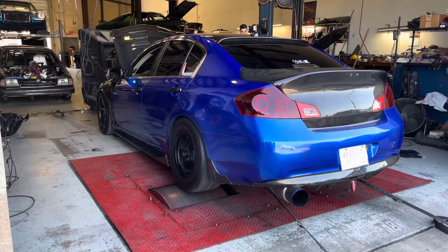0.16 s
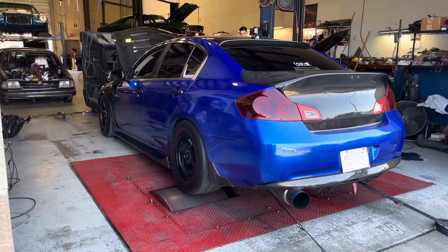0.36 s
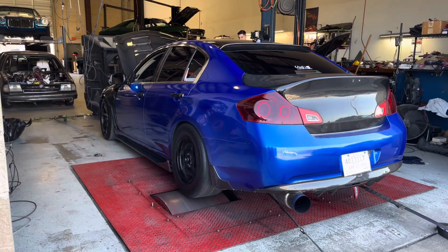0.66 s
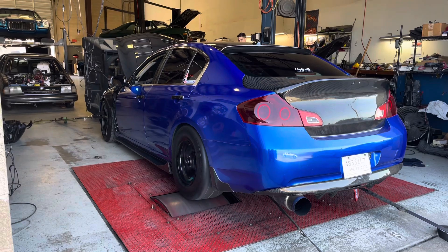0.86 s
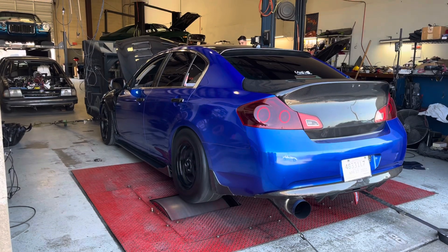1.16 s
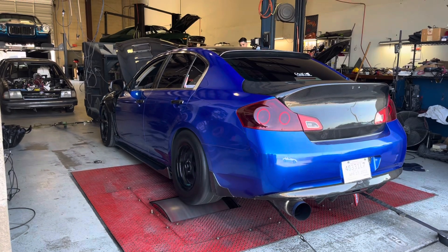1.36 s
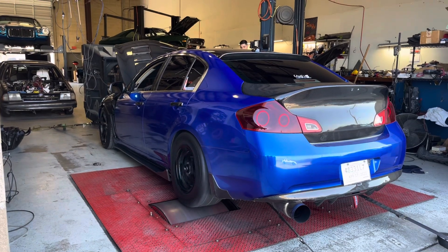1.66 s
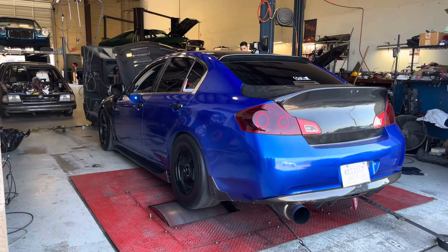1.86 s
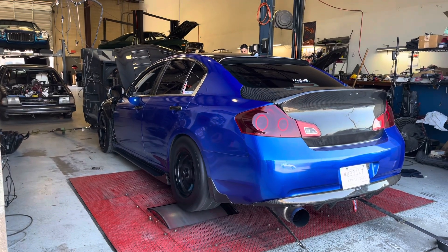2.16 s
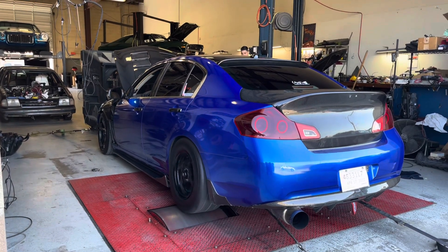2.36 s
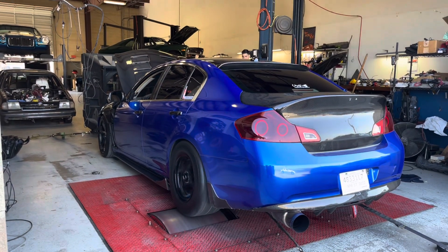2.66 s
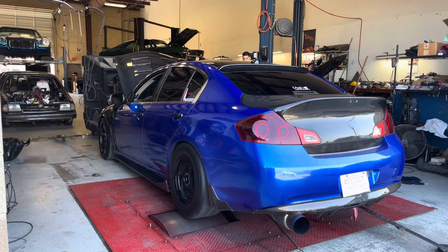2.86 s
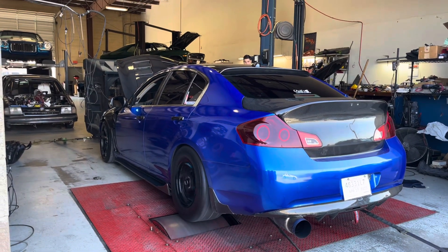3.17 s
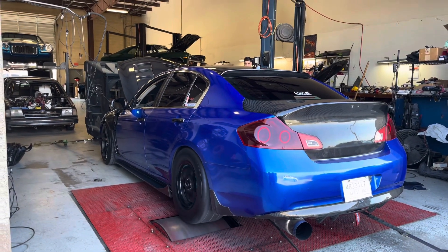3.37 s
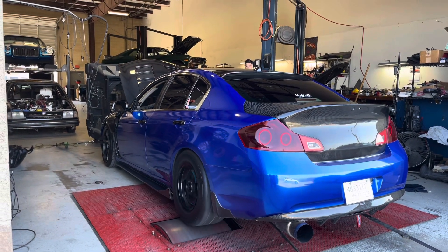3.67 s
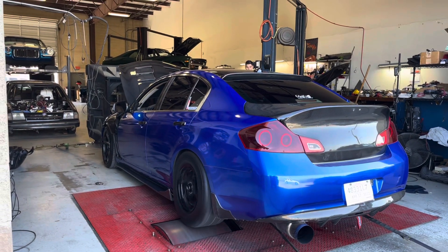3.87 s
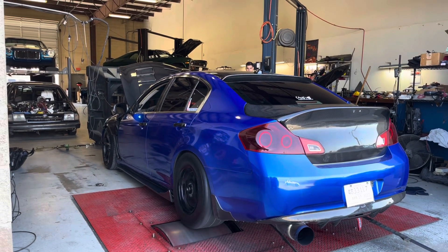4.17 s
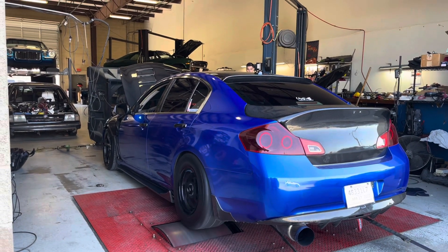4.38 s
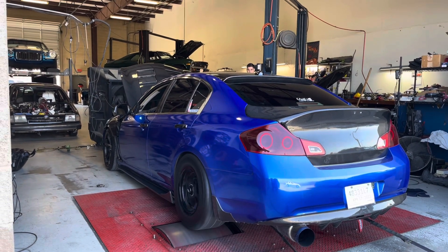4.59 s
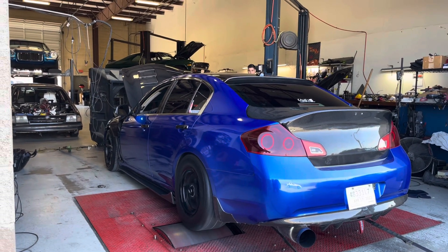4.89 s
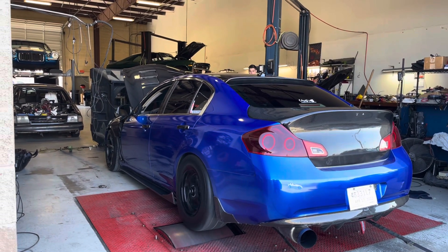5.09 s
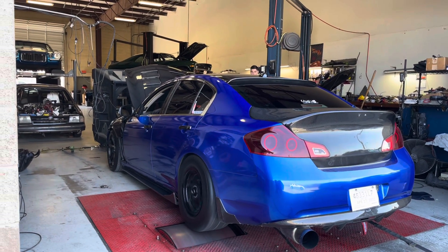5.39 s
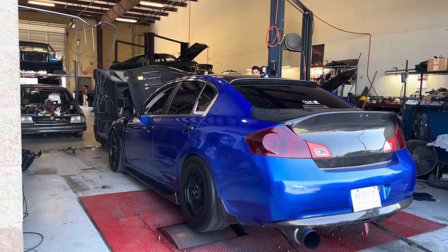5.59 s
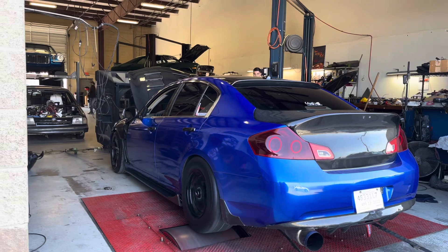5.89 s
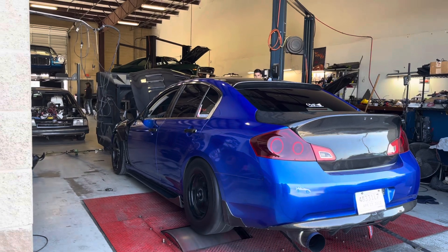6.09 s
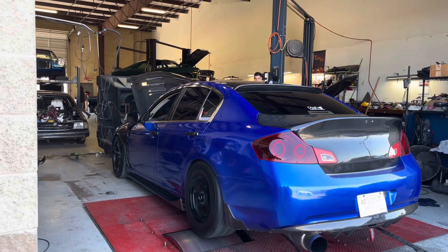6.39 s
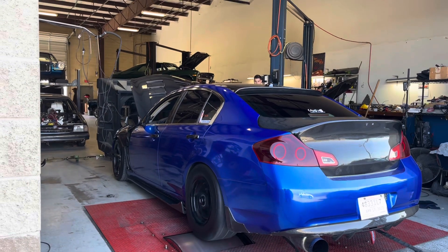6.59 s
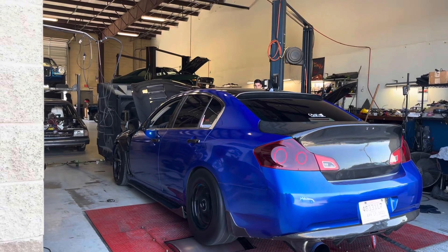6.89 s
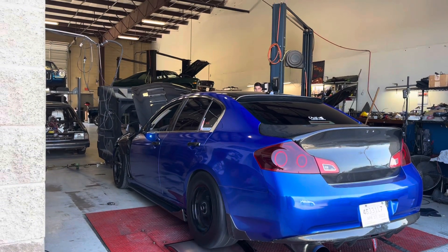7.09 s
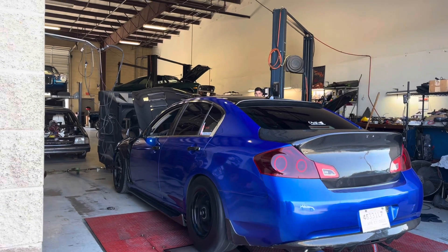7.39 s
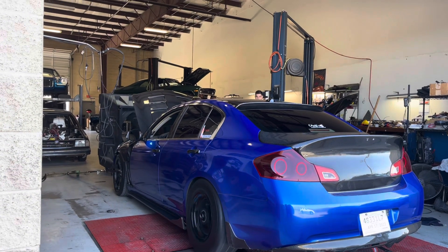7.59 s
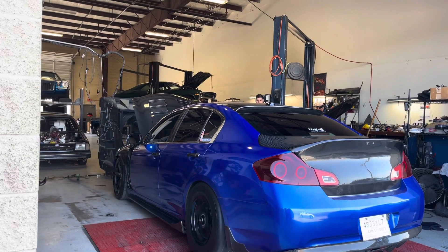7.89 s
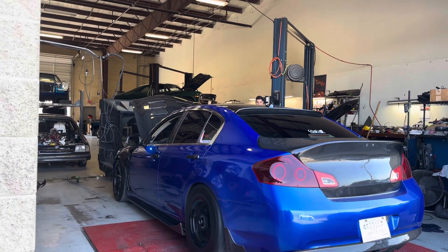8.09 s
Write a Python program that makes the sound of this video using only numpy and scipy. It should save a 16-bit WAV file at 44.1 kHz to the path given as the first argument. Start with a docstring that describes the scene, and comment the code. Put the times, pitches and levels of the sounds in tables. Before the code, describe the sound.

Loud, close exhaust note in stereo, climbing continuously for eight seconds without a gear change or lift. Deep boom, uneven cylinder bark and metallic buzz come with pulsing gas hiss. Early on it lopes and spits; at about two seconds it jumps into a harder, brighter tone. Later a thin whine joins the howl. Light air rumble touches the microphone; the garage adds a short, dense echo.

```python
"""V6 full-throttle pull on a workshop dynamometer.

Heard from behind the car: firing harmonics boom, uneven cylinder pulses bark through filters, steep pulse
fronts rasp and whine at the tailpipe, and gated noise makes the roar and jet hiss as the revs climb.
At 2.17 s the engine comes on cam and the note hardens. Noise-burst reflections form the room;
a noise draught and short decaying low tones thump the microphone."""
import sys
import numpy as np
from scipy import signal
from scipy.fft import rfft, irfft, next_fast_len
from scipy.io import wavfile
from scipy.ndimage import uniform_filter1d, map_coordinates

SR = 44100
rng = np.random.default_rng(int(sys.argv[2]) if len(sys.argv) > 2 else 0)


def int16_out(signal):
    """Quantize to a 16-bit WAV file."""
    q = np.round(np.clip(np.atleast_2d(signal).T, -1, 1) * 32767)
    wavfile.write(sys.argv[1], SR, q.astype(np.int16))


N = 363825
TIME_S = np.arange(N) / SR
LEFT_RIGHT = np.array([[1], [-1]])   # opposite signs at the two microphones


def from_db(db):
    """Amplitude ratio of a level in dB."""
    return 10 ** (np.asarray(db) / 20)


def rms_one(x):
    """Scale to unit RMS."""
    return x / np.sqrt(np.mean(x ** 2) + 1e-20)


def in_time(rows):
    """Second column of a (time, value) table, interpolated at every sample."""
    time_s, value = np.transpose(rows)
    return np.interp(TIME_S, time_s, value)


def bump(x, centre, half_width):
    """Gaussian bump of height 1, down to 1/e at the half width."""
    return np.exp(-((x - centre) / half_width) ** 2)


def drift(rate_hz):
    """Smooth random curve of unit RMS."""
    knots = rng.standard_normal(int(rate_hz * N / SR) + 4)
    return rms_one(map_coordinates(knots, [TIME_S * rate_hz], order=2))


def colour(x, points):
    """Minimum-phase filter through (frequency [Hz], level [dB]) points; its peaks ring after each pulse."""
    size = 2 * next_fast_len(N // 2 + 8192)
    hz, db = np.transpose(points)
    grid_hz = np.maximum(np.arange(size // 2 + 1) * SR / size, 1)
    gain = from_db(np.interp(np.log(grid_hz), np.log(hz), db))
    cepstrum = irfft(np.log(gain))
    # fold the cepstrum to make the filter causal
    cepstrum[1:size // 2] *= 2
    cepstrum[size // 2 + 1:] = 0
    return irfft(rfft(x, size) * np.exp(rfft(cepstrum)))[..., :N]


# near-steady climb, jump on cam: (time [s], speed [firings/s])
SPEED = [(0.0, 147.5), (0.75, 162.5), (1.5, 174.7), (2.12, 184.2), (2.21, 191.0), (3.1, 215.3),
         (4.3, 247.7), (5.6, 283.1), (7.0, 319.3), (8.25, 350.8)]


def engine_speed():
    """Firing rate [1/s] through the pull."""
    return in_time(SPEED)


CAM_S, CAM_SWITCH_S = 2.17, 0.016


def cam():
    """Smooth switch: 0 before the engine comes on cam, 1 after."""
    return .5 + .5 * np.tanh((TIME_S - CAM_S) / (2 * CAM_SWITCH_S))


def surge(fade_s):
    """Jumps to 1 as the engine comes on cam, then decays exponentially."""
    return cam() * np.exp(-np.maximum(TIME_S - CAM_S, 0) / fade_s)


HARD_AT_SWITCH, HARD_AT_TOP, HARDEN_S = 0.25, 0.87, 0.69   # shares of on-cam tone (0-1); time constant


def hardness():
    """Share of on-cam tone: steps up at the switch, then settles at its top value."""
    return np.clip(HARD_AT_TOP * cam() - (HARD_AT_TOP - HARD_AT_SWITCH) * surge(HARDEN_S), 0, 1)


# cylinders in firing order: (lateness [firing intervals], strength [dB])
CYLINDERS = [(.255, -2.5), (.37, 0), (.335, .5), (.332, 0), (.295, 0), (.29, -1)]


def cylinder_lines(orders):
    """Complex strength that six unevenly spaced pulses give each multiple of the cycle rate."""
    late, db = np.transpose(CYLINDERS)
    place = (np.arange(len(late)) + late) / len(late)
    return np.exp(-2j * np.pi * np.outer(orders, place)) @ from_db(db)


def cycle_wave(firings, orders, lines, size=4096):
    """One engine cycle summed from its lines, repeated as the crank turns."""
    place = np.arange(size) / size
    wave = np.real(lines @ np.exp(2j * np.pi * np.outer(orders, place)))
    return np.interp(firings / len(CYLINDERS), place, wave, period=1)


def pulse_fronts(firings, count):
    """Train of steep pulses with all lines below count."""
    orders = np.arange(1, count)
    return cycle_wave(firings, orders, cylinder_lines(orders))


def gusts(firings, sharpness):
    """Gas leaves in one gust per firing."""
    return rms_one(np.exp(sharpness * np.cos(2 * np.pi * (firings - .36))))


LOPE_LOW, LOPE_FADE_S, LOPE_ON_CAM = 0.54, 0.67, 0.076   # depths (0-1); time to 1/e


def lope(firings):
    """Uneven burning at low revs throbs the gas flow once per cycle; slight again on cam."""
    depth = LOPE_LOW * np.exp(-(TIME_S / LOPE_FADE_S) ** 4) + LOPE_ON_CAM * cam()
    depth = np.clip(depth, 0, .9)
    swing = 1 + depth * np.cos(2 * np.pi * (firings / len(CYLINDERS) - .45))
    return swing / np.sqrt(1 + depth ** 2 / 2)


OPENING_DB, OPENING_S, REFERENCE_HZ = 4, 0.33, 195   # initial shortfall, time constant, firing rate


def gas_flow(speed, level_db, octave_db, surge_db, surge_s):
    """Flow-noise level [dB]: builds as the throttle opens, surges on cam, eases with revs."""
    opening_db = -OPENING_DB * np.exp(-TIME_S / OPENING_S)
    revs_db = octave_db * np.log2(speed / REFERENCE_HZ)
    return level_db + opening_db + surge_db * surge(surge_s) + revs_db


# pipe and room modes: (centre [Hz], width [Hz], level [dB])
STANDING_WAVES = [(154.2, 24, -7.0), (176.6, 26, -15), (209.6, 16.7, -15), (242.7, 36, -13.0),
                  (275, 10.5, -16), (298.8, 14, -16), (329.6, 22.3, -14.0), (355.5, 15.5, -18),
                  (440.7, 34, -20.5), (486, 24, -18), (534.2, 21.5, -19), (584, 16.7, -23),
                  (634.4, 7.7, -23), (667, 64, -28.5), (721.5, 14, -23.5), (754.5, 15.8, -16.5),
                  (805.6, 21.5, -19), (850.7, 19, -18.5), (893, 28, -21), (1105, 183, -23.5),
                  (1202, 16, -17), (1336, 200, -18)]
BETWEEN_WAVES_DB = -47


def standing_waves(hz):
    """Level [dB] that pipe and room modes give a tone."""
    grid_hz = np.arange(2000)
    power = from_db(BETWEEN_WAVES_DB) ** 2
    for centre_hz, width_hz, db in STANDING_WAVES:
        power = power + from_db(db) ** 2 * .5 ** ((2 * (grid_hz - centre_hz) / width_hz) ** 2)
    return np.interp(hz, grid_hz, 10 * np.log10(power))


RIPPLE_SHARE, RIPPLE_FROM_HZ, RIPPLE_TO_HZ = 0.64, 130, 980


def ripple():
    """Standing-wave peaks and dips about their local mean: (frequency [Hz], level [dB])."""
    hz = np.linspace(RIPPLE_FROM_HZ, RIPPLE_TO_HZ, 160)
    db = standing_waves(hz)
    local_mean_db = 10 * np.log10(uniform_filter1d(from_db(db) ** 2, size=25))
    db = np.clip(db - local_mean_db, -14, 5)
    db[[0, -1]] = 0
    return np.stack([hz, RIPPLE_SHARE * db], axis=1)


STILL_AIR_DB = -64
# draughts: (time [s], half length [s], level [dB])
DRAUGHTS = [(.1, .5, -36), (1.85, 0.16, -46), (5.05, 0.17, -45)]
# draught spectrum: (frequency [Hz], level [dB])
DRAUGHT_COLOUR = [(10, -10), (25, 1), (50, -1), (100, -2), (300, -36.5)]
# puffs: (time [s], peak level [dB], frequency [Hz])
PUFFS = [(1.648, -26, 62), (2.184, -14.5, 84), (4.148, -24, 70)]


def air(rise_s):
    """Draughts stir low noise at the microphone; puffs are low sines under a soft pulse envelope."""
    stir = from_db(STILL_AIR_DB)
    for time_s, half_s, db in DRAUGHTS:
        stir = stir + from_db(db) * bump(TIME_S, time_s, half_s)
    out = stir * rms_one(colour(rng.standard_normal(N), DRAUGHT_COLOUR))
    for time_s, db, hz in PUFFS:
        age_s = np.maximum(TIME_S - time_s, 0)
        envelope = (age_s / rise_s * np.exp(1 - age_s / rise_s)) ** 3
        out = out + from_db(db) * envelope * np.sin(2 * np.pi * hz * age_s)
    return out


def workshop(x, t60_s, spread_hz):
    """Dense reflections off walls and cars: shared bass, unrelated treble at the two microphones."""
    age_s = TIME_S[:SR]
    decay = from_db(-60 * age_s / t60_s) * (age_s > .006)
    mid, side = rng.standard_normal((2, SR)) * decay
    side = signal.sosfilt(signal.butter(1, spread_hz, "high", fs=SR, output="sos"), side)
    echoes = (mid + side * LEFT_RIGHT) / np.sqrt(2 * np.sum(mid ** 2))
    return signal.fftconvolve(x[None], echoes, axes=1)[:, :N]


# tailpipe spits: (time [s], peak level before spit_db [dB])
SPITS = [(0.0882, -27), (0.174, -23), (0.332, -17), (0.3701, -33), (0.409, -27), (0.7108, -22),
         (0.7853, -21), (0.8215, -23), (0.8589, -16), (0.924, -21), (1.0026, -18), (1.07, -19),
         (1.081, -15), (1.8898, -17), (2.1496, -19)]
# hiss common to both microphones: (frequency [Hz], level [dB])
JET_MID = [(1650, -28.5), (2800, -2.5), (3940, -7), (4710, -7), (5820, -7), (7060, -5.5), (8030, -2.5),
           (9190, -2.5), (9670, -5.5), (10100, -38), (10800, 0.5), (11300, 3), (11900, -3.5),
           (13000, -12.5)]
# hiss differing between them: (frequency [Hz], level [dB])
JET_SIDE = [(1650, -32), (2800, -6.5), (3270, -5.5), (4640, -13), (7730, -14.5), (8230, -15), (8690, -16),
            (9710, -5), (10700, -1), (11400, -9), (11900, -17), (12200, -16), (15900, -52), (22000, -120)]
JET_SWELL_S, JET_SWELL_HALF_S, JET_SWELL_DB = 3.9, 0.53, 2.5


def jet(firings, speed, throb, side_db, spit_db, spit_s):
    """Escaping gas hisses in pulses, swells mid-pull and spits sharply."""
    jet_db = gas_flow(speed, level_db=-38.5, octave_db=-2.0, surge_db=6.5, surge_s=0.24)
    jet_db = jet_db + JET_SWELL_DB * bump(TIME_S, JET_SWELL_S, JET_SWELL_HALF_S)
    flow = from_db(jet_db + 9 * np.log10(throb)) * gusts(firings, sharpness=0.21)
    for time_s, db in SPITS:
        start = int(time_s * SR)
        age_s = np.arange(N - start)[:SR // 20] / SR
        flow[start:][:len(age_s)] += from_db(db + spit_db) * np.exp(-age_s / spit_s)
    mid, side = (rms_one(colour(rng.standard_normal(N) * flow, c)) for c in (JET_MID, JET_SIDE))
    return np.sqrt(np.mean(flow ** 2)) * (mid + from_db(side_db) * side * LEFT_RIGHT)


# turbulence spectrum: (frequency [Hz], level [dB])
TURBULENCE = [(25, -29), (80, -9), (170, -1), (300, -2), (420, -6), (800, -3), (930, -5), (1180, -5.5),
              (1380, -1), (1580, -9), (2000, -9.5), (2400, -10.5), (3000, -28), (5000, -50)]


def roar(firings, speed, throb):
    """Exhaust turbulence: noise gated by each gust, coloured by the pipe."""
    roar_db = gas_flow(speed, level_db=-33.5, octave_db=-3.5, surge_db=5.0, surge_s=0.38)
    eddies = throb * gusts(firings, sharpness=0.5) * rng.standard_normal(N)
    return from_db(roar_db) * rms_one(colour(eddies, TURBULENCE))


# thin upper tailpipe ring: (frequency [Hz], level [dB])
WHINE = [(2300, -32.5), (2850, 6), (3400, 1.5), (3700, -8), (4300, -11.5), (6000, -26)]
WHINE_PEAK_HZ, WHINE_HALF_WIDTH_HZ = 308, 72   # firings/s


def whine(firings, speed, level_db):
    """Clean pulse fronts ring the upper pipe; strongest near one speed, easing near the top."""
    strength = from_db(level_db) * bump(speed, WHINE_PEAK_HZ, WHINE_HALF_WIDTH_HZ)
    return strength * rms_one(colour(pulse_fronts(firings, count=120), WHINE))


# rasp spectrum: (frequency [Hz], level [dB])
RASP = [(900, -57), (1500, -14), (1700, -5.5), (1850, 11), (2050, 9), (2350, 10), (2650, -3), (3100, -5.5),
        (3600, -22), (4500, -32.5), (7000, -31)]
# rasp before trim_db: (time [s], level [dB])
RASP_LEVEL = [(0.03, -36), (0.05, -36), (0.19, -32.5), (0.71, -31.5), (2.02, -31.5), (2.31, -27),
              (3.08, -34.5), (3.69, -30.5), (5.41, -30), (6.5, -30), (7.99, -33), (8.15, -30.5)]


def rasp(firings, throb, rough, grit, trim_db):
    """Steep, slightly varying pulse fronts and gated noise set the tailpipe buzzing."""
    fronts = pulse_fronts(firings, count=200) * (1 + rough * drift(250))
    breakup = gusts(firings, sharpness=1.3) * rng.standard_normal(N)
    buzz = rms_one(colour(throb * fronts, RASP)) + grit * rms_one(colour(throb * breakup, RASP))
    running_rms = np.sqrt(uniform_filter1d(buzz ** 2, size=6000))
    return from_db(in_time(RASP_LEVEL) + trim_db) * buzz / running_rms


# cycle lines: (multiple of cycle rate, level at low revs [dB], level on cam [dB])
ORDER_DB = [(2, -58, -45), (3, -42.5, -39), (4, -46, -51), (5, -37, -41.5), (7, -42, -35), (8, -53, -41.5),
            (9, -40, -37), (10, -45.5, -44), (11, -37.5, -41), (13, -38, -35.5), (14, -69, -35),
            (15, -43, -32.5), (16, -48, -45), (17, -40, -42.5), (19, -35, -31.5), (20, -101, -37.5),
            (21, -38, -37.5), (22, -48, -75), (23, -55, -40), (25, -32.5, -30), (26, -60, -31),
            (27, -47, -41), (28, -42, -88), (29, -39.5, -44.5), (30, -29.5, -33.5), (31, -37, -30.5),
            (32, -35.5, -33), (33, -74, -39.5), (34, -56, -60), (35, -30.5, -51), (36, -27.5, -34),
            (37, -31, -36), (38, -91, -34), (39, -45, -70.5), (40, -41, -52), (41, -36, -51),
            (42, -31.5, -32), (43, -38, -27.5), (44, -66, -84), (45, -40.5, -45), (46, -47, -64),
            (47, -36.5, -53), (48, -37, -29), (49, -37, -35)]
# exhaust spectrum: (frequency [Hz], level [dB])
PIPE = [(30, -2), (105, -3), (155, 8.5), (280, 4), (390, -3.5), (480, 0.5), (660, -10), (810, 0),
        (940, -11), (1060, 0.5), (1200, 4), (1380, -2), (1620, -19), (1950, -12.5), (2400, -39),
        (2900, -18)]
# bark gain: (time [s], level [dB])
BARK_LEVEL = [(0, -1.5), (.5, 2), (2.1, -3), (2.22, 0), (3.1, -.5), (3.8, 3), (4.6, 0), (5.6, 0),
              (6.6, 1.5), (8.25, 0.2)]


def bark(firings, on_cam, throb, rough):
    """Unequal cylinders fill the lines between firing harmonics; the exhaust rings with them."""
    orders, low_db, high_db = np.transpose(ORDER_DB)
    orders = np.round(orders)
    # firing harmonics align into pulses; reflections spread the other lines around the cycle
    aligned = np.angle(cylinder_lines(orders))
    spread = 1.18 * orders ** 2 + 2.4 * orders
    phase = np.exp(1j * np.where(orders % len(CYLINDERS) == 0, aligned, spread))
    low, high = (cycle_wave(firings, orders, np.sqrt(2) * from_db(db) * phase) for db in (low_db, high_db))
    lines = ((1 - on_cam) * low + on_cam * high) * (1 + rough * drift(200))
    return from_db(in_time(BARK_LEVEL)) * colour(colour(lines, PIPE), ripple()) * throb ** 0.69


# firing harmonics 1 to 4: (level at low revs [dB], level on cam [dB])
FIRING_DB = [(-0.05, 0.02), (-6, -2.5), (-3.5, -7.5), (-5.5, -10.5)]


def boom(firings, speed, flutter_db, lag_s, sway_db, twist_rad):
    """Low firing harmonics swell and fade as they sweep through pipe and room modes."""
    heard = np.stack([firings, firings - lag_s * speed])   # right microphone a little farther off
    out, switched = 0, cam()
    for k, (low_db, cam_db) in enumerate(FIRING_DB, 1):
        db = standing_waves(k * speed) + low_db + (cam_db - low_db) * switched
        # microphones differ more at shorter wavelengths
        pan_db = k * drift(5.1) * LEFT_RIGHT * sway_db
        skew_rad = k * drift(5.1) * LEFT_RIGHT * twist_rad
        level = from_db(db + pan_db + flutter_db * k * drift(40))
        out = out + level * np.cos(2 * np.pi * k * heard + skew_rad + (k - 1) * np.pi / 4)
    return np.sqrt(2) * out


def scene():
    """Engine speed and cam switch drive the engine layers; the workshop answers."""
    speed = engine_speed()
    firings = np.cumsum(speed) / SR
    shaky = firings + 0.0046 * drift(120)   # burn times vary
    throb = lope(firings)

    hiss = jet(firings, speed, throb, side_db=1.5, spit_db=-5, spit_s=0.00066)
    turbulence = roar(firings, speed, throb)
    thin = whine(firings, speed, level_db=-40.0) * from_db([[-2], [1]])
    # noise share falls as revs rise
    buzz = rasp(shaky, throb, rough=0.031, grit=(115 / speed) ** 2, trim_db=-0.2)
    mid = bark(shaky, hardness(), throb, rough=0.075)
    low = boom(firings, speed, flutter_db=0.24, lag_s=.00009, sway_db=1.0, twist_rad=0.15)

    direct = low + (mid + turbulence) * from_db([[-.3], [.3]]) + buzz * from_db([[-5], [2.5]])
    rumble = from_db(-22) * low[0] + from_db(-2) * turbulence
    room_feed = rumble + from_db(-6.5) * mid + from_db(-7.5) * buzz
    room = workshop(room_feed, t60_s=0.14, spread_hz=220)
    return direct + thin + room + hiss + air(rise_s=0.007)


STOPBAND_HZ = 14000


def record(dry):
    """Clip the highest peaks, then low-pass steeply."""
    low_pass = signal.cheby2(14, 60, STOPBAND_HZ, fs=SR, output="sos")
    return signal.sosfilt(low_pass, np.clip(dry, -.95, .95))


dry = scene()
out = record(dry)
int16_out(out)
```